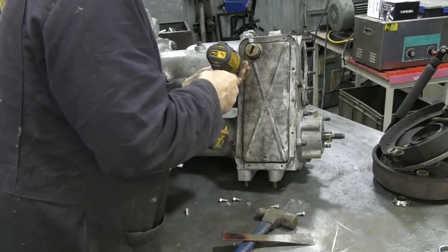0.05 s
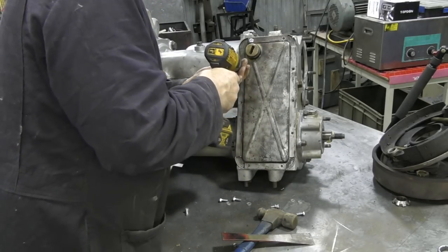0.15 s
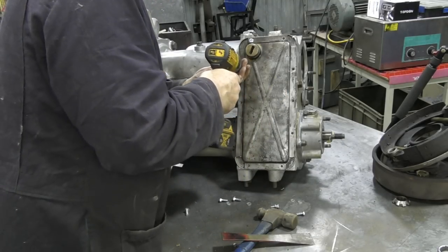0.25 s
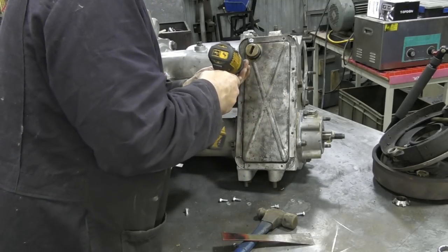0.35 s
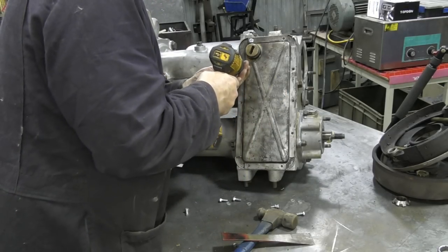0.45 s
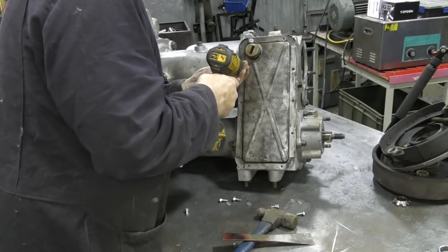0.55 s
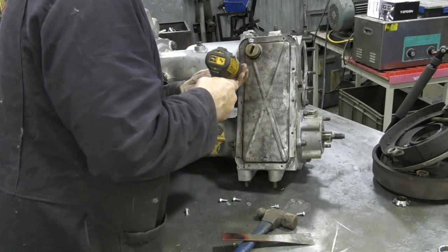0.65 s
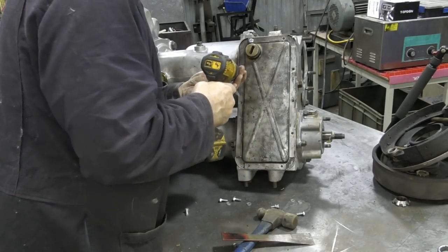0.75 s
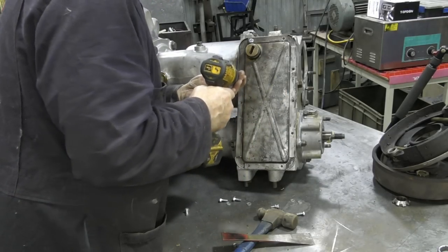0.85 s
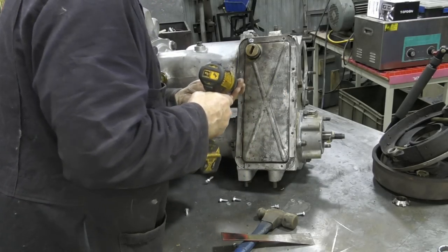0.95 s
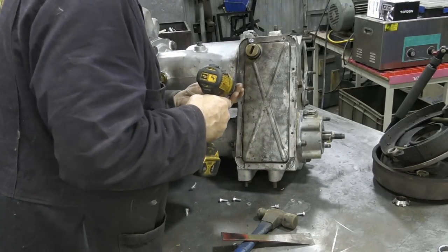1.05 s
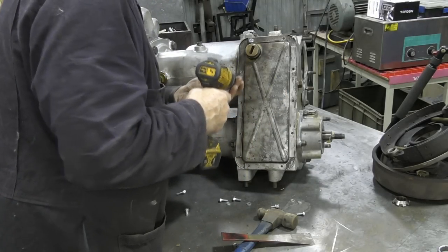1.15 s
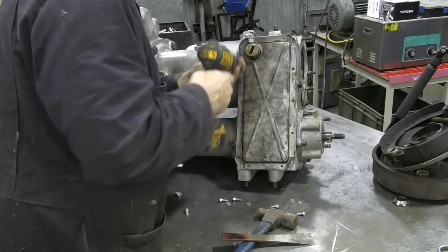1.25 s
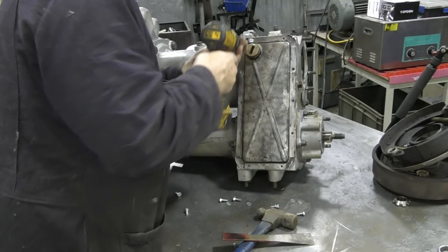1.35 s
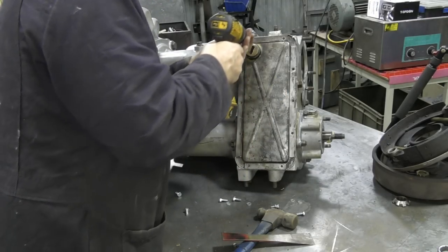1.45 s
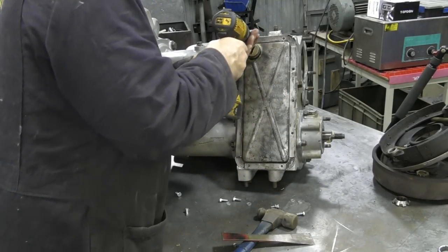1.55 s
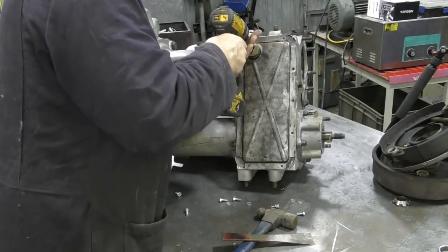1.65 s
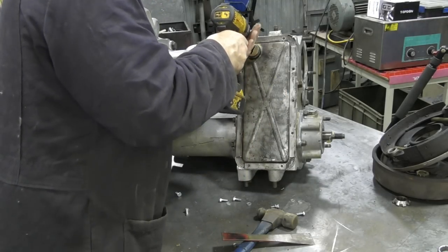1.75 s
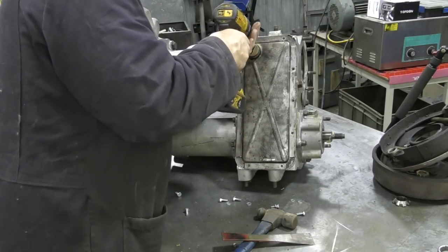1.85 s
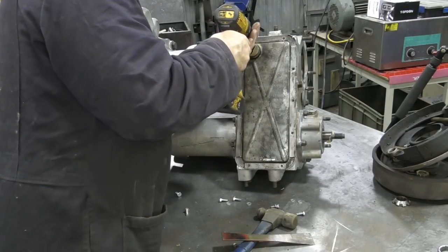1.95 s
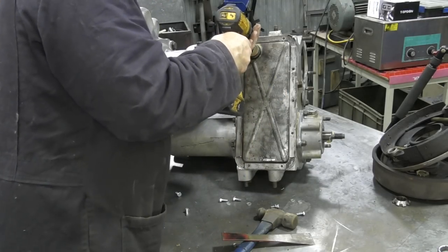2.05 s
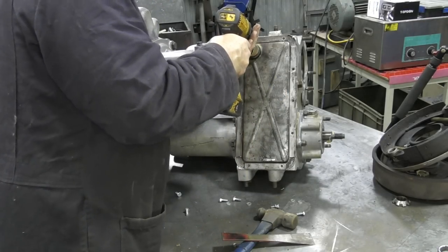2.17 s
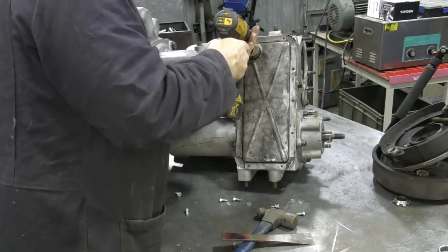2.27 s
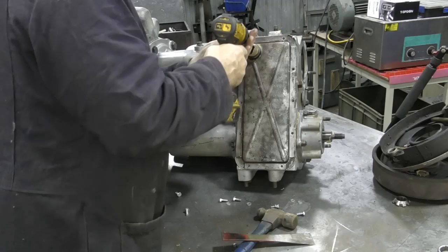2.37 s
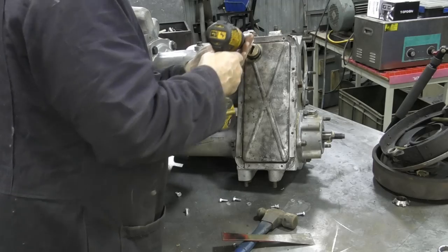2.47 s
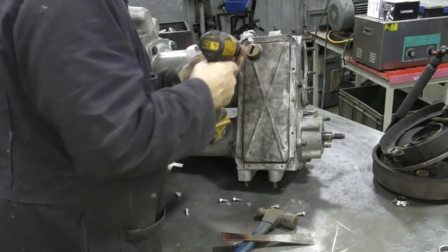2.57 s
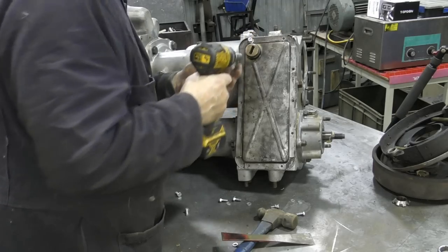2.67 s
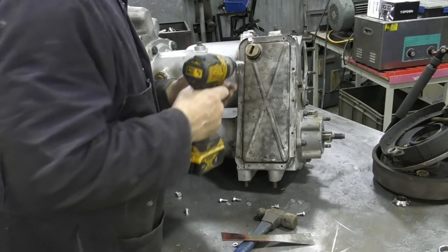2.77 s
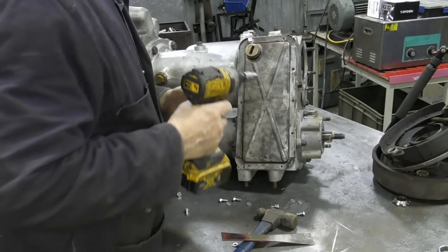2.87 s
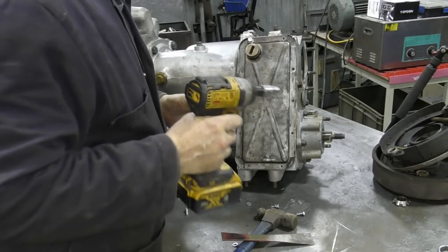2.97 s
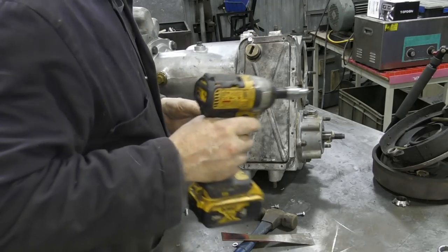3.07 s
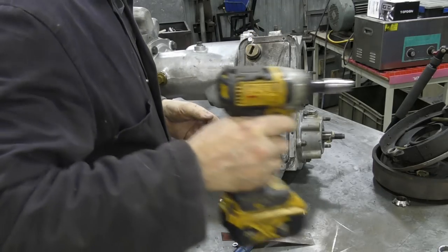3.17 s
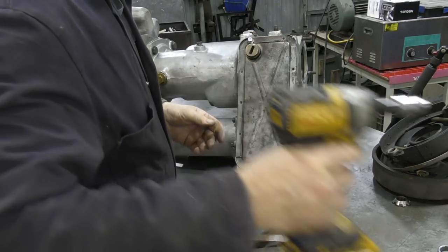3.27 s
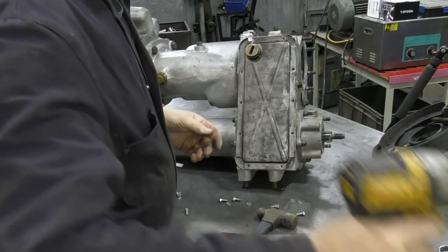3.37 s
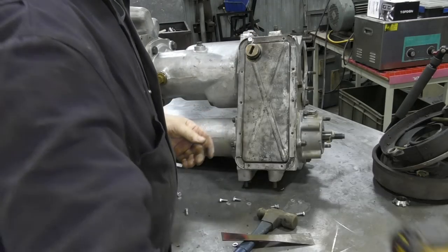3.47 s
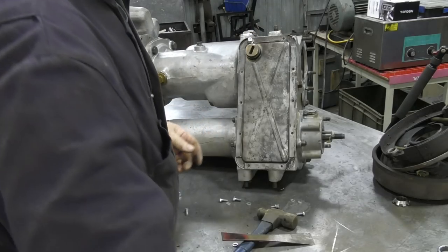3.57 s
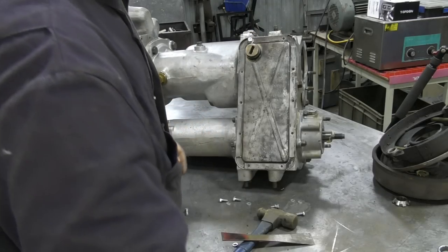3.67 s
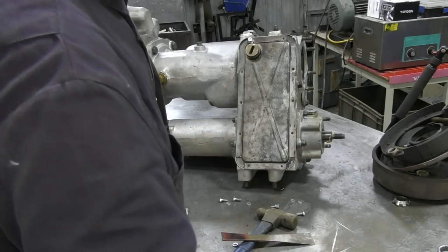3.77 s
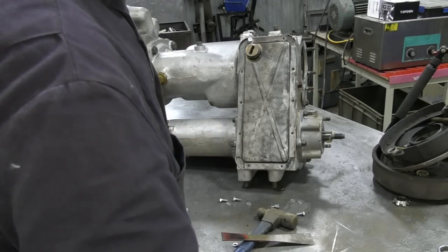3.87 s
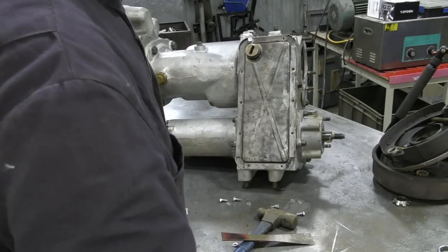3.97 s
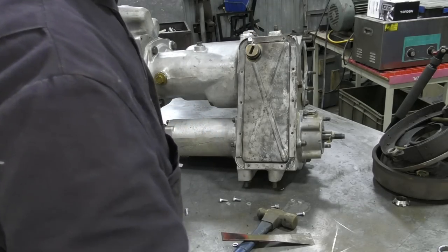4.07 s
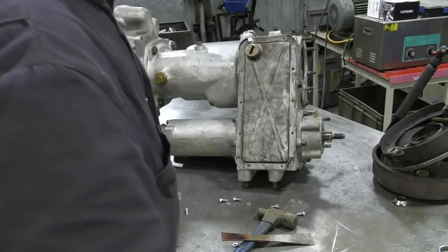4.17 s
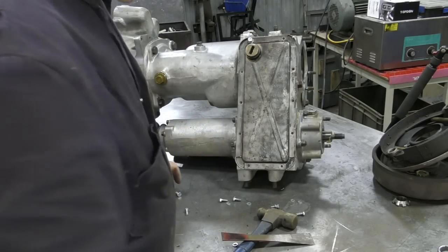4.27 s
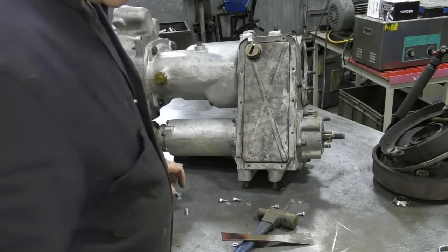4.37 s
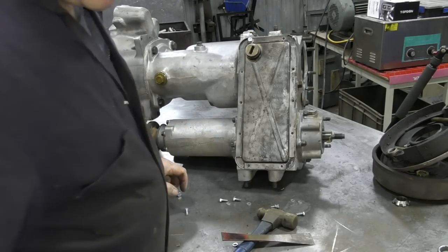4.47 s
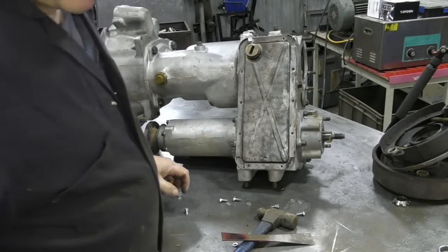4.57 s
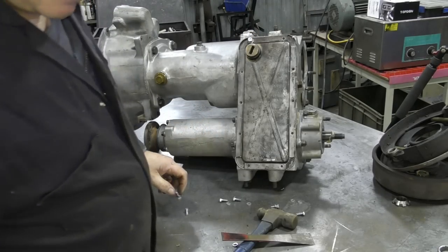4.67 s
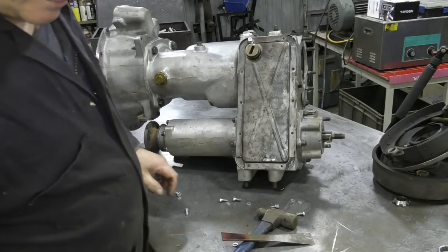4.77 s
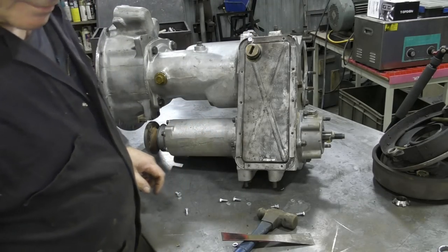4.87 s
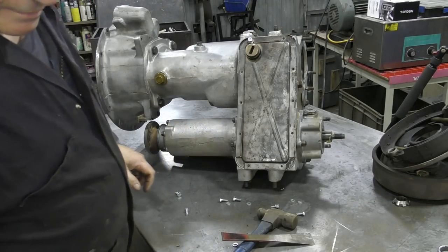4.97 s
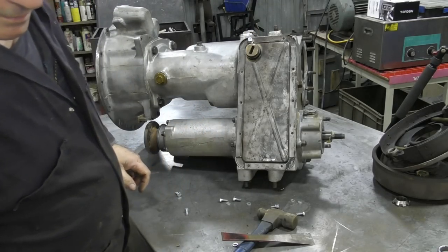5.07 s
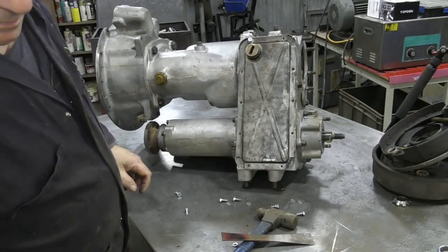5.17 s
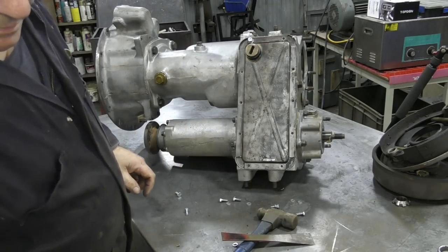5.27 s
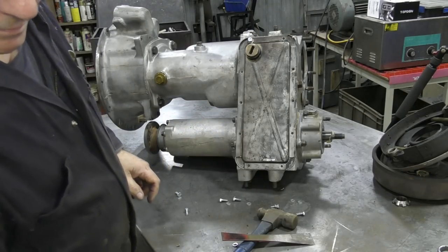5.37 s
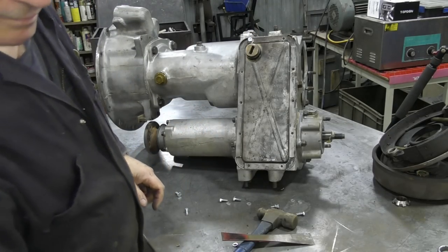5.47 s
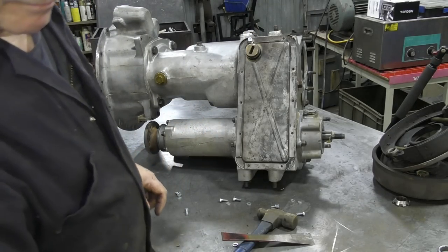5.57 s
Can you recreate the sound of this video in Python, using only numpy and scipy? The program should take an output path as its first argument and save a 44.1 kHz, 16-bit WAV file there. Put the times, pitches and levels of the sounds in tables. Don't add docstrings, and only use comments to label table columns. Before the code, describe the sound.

A close, almost mono workshop scene with a short hard-walled reverberation and a quiet bed of ventilation air and unsteady lamp hum. It opens mid-action: a cordless impact driver strains and hammers roughly, then speeds up in a higher gear whine as the bolt frees, cutting off around 0.36 s with a brief fan rundown. The bolt leaves the socket at 0.4 s, taps lightly, then bounces brightly from 0.63 to 0.9 s, rattling and ticking until about 1.2 s. The socket clicks and clinks onto the next head from 1.25 to 1.65 s amid cloth rustle. A second, shorter driver burst runs 1.66-1.93 s with sharp steel snaps and a small metallic ring. Soft overalls and shuffling feet follow. At 3.38 s the tool lands with a woody-plastic, hollow bench knock, rocking again at 3.5 s. Faint creasing cloth continues until a gritty steel scrape with small clanks at 5.3-5.6 s.

```python
import sys
import numpy as np
from scipy import signal
from scipy.fft import rfft, irfft, next_fast_len
from scipy.io import wavfile
from scipy.ndimage import uniform_filter1d, map_coordinates

SR = 44100
rng = np.random.default_rng(int(sys.argv[2]) if len(sys.argv) > 2 else 0)


def volts(x):
    e = np.asarray(x, float) / 20
    return 10 ** e


def digitize_waveform(pressure):
    field = np.atleast_2d(pressure).T
    bounded = np.clip(field, -1, 1)
    quanta = np.round(bounded * 32767).astype(np.int16)
    wavfile.write(sys.argv[1], SR, quanta)


N = 248018
T = np.arange(N) / SR

# time in seconds, commutation in Hz, shaking in dB, coil current in dB.
PULL_1 = [(0, 1600, -14, -23.5), (.055, 1671, -12.5, -23), (.07, 1618, -17, -21),
          (.115, 1623, -15.5, -22.5), (.15, 1828, -12, -20), (.295, 2247, -11, -25),
          (.315, 2192, -12, -21.5), (.339, 1277, -9.5, -27), (.358, 900.6, -15.5, -45.5)]
PULL_2 = [(1.655, 1206, -25, -41.5), (1.673, 1332, -22, -31), (1.68, 1363, -6.5, -22.5),
          (1.697, 1694, -8, -27), (1.708, 1400, -14.5, -37.5), (1.742, 1767, -12.5, -22),
          (1.8, 1919, -12.5, -22), (1.878, 2023, -11, -23), (1.925, 1974, -13.5, -50)]
# multiple of commutation, level over the current in dB, extra under load in dB.
LOW_ORDERS = [(1, -2.5, -0.5), (2, 0, 4.5), (3, 1.5, 1)]
# multiple of commutation, level in dB.
UPPER_ORDERS = [(4, 4.5), (5, -6), (6, -3), (7, -9)]
# frequency in Hz, density in dB per Hz.
WHIRR = [(35, -77.5), (60, -44), (882, -16.5), (1310, -8.5), (1620, -12), (1950, -10), (2250, -13),
         (2470, -5.5), (2970, -7), (3940, -10.5), (10800, -13.5), (13300, -24), (16000, -38.5)]
# frequency in Hz, width in Hz, level in dB.
COVER = [(750, 22, -5.5), (1350, 440, -13), (2520, 15, 1), (2760, 310, -5.5)]
# time in seconds, level in dB.
HUM = [(0, -19), (.04, -37.5), (.13, -45), (.17, -27.5), (.21, -36.5), (.24, -44.5)]
# start in seconds, level in dB, rise in seconds, fall in seconds.
RUNDOWN = [
    (.36, -38.5, .005, 0.073),
    (1.93, -33, .005, 0.093),
]
# frequency in Hz, density in dB per Hz.
FAN = [(60, -30), (150, -3.5), (1000, -1.5), (4000, -3.5), (10000, -4.5), (13000, -14.5), (16000, -32)]
# time in seconds, level in dB, weight on socket and plate in dB.
JOLTS = [(0.0304, -1, -6), (0.0584, -1.5, -5), (0.1134, -4, -9.5), (0.2464, -6.5, -1), (0.2932, -1, -4),
         (0.3204, -4.5, -3), (0.3441, -4, -5.5), (0.6894, 1, -14), (0.8394, -11.5, -10.5), (1.6835, -5, -1),
         (1.699, -7.5, -2), (1.7534, -3, -5), (1.8914, -3, -1), (1.9164, -8.5, -0.5), (5.3298, -15, -6)]

# frequency in Hz, width in Hz, level in dB.
BOLT = [(4848, 580, -17.5), (5620, 1000, -8), (6520, 660, 2), (7280, 1100, 0.5), (8200, 740, -0.5),
        (9840, 1600, -4), (13000, 5600, -14)]
SOCKET = [(1400, 700, -5), (2140, 600, -2.5), (3140, 1200, -3), (4800, 3900, -9)]
PLATE = [(136, 34, -8), (254, 92, -5), (520, 180, -1.5), (746, 53, 4.5), (985, 130, -2)]
# time in seconds, bright peak in dB, weight on socket and plate in dB.
FREED = [
    (0.4091, -8, -1),
    (0.3924, -24, 14),
]
LOOSE = [
    (0.4843, -23.5, 5.5),
    (0.5604, -19, 12.5),
]
BOUNCES = [(0.63, 6.5, 3), (0.7555, -4, 4), (0.7755, 4.5, 0), (0.9048, -3.5, 2), (5.3592, -17.5, 12.5),
           (5.3926, -15.5, 18)]
# time in
# seconds, peak in dB, weight on socket and plate in dB.
SEATING = [(1.2514, -23, 4), (1.2794, -38.5, -2), (1.4039, -32.5, -16), (1.4198, -45.5, 5),
           (1.4314, -44, 0.5), (1.4563, -40, -0.5), (1.4803, -32, 7.5), (1.4856, -31.5, 8.5),
           (1.6064, -39, -8), (1.6141, -26.5, -5.5), (1.6357, -30, -0.5), (1.6746, -6, -3.5),
           (1.7045, -7, -2.5), (3.5061, -24.5, -1.5)]
# time in seconds, level in dB.
FAINT = [(2.5904, -54), (2.7447, -53.5), (2.8124, -58.5), (3.314, -56.5), (3.7418, -57), (3.7964, -56.5),
         (3.8494, -68), (3.9814, -61), (4.3176, -55.5)]
TICKS = [(1.0889, -29), (1.1024, -32.5), (1.1144, -26.5), (1.1518, -29), (1.163, -32), (1.1757, -26),
         (1.19, -33), (1.2276, -27), (1.5708, -40), (3.4974, -29.5)]
# start in seconds, level in dB, hold in seconds, bench in dB.
ROLL = [(0.638, -13, 0.092, -8), (0.702, -19, 0.0033, -3.5), (0.767, -22.5, 0.031, -7),
        (0.783, -18, 0.012, -8), (0.908, -28, 0.0069, -11.5), (1.068, -48.5, 0.086, -1.5),
        (1.147, -41.5, 0.01, -5.5)]

SNAP_S = [.321, .345, .484, .5605, .698, .738, .776, 1.2514, 1.278, 1.4015, 1.616, 1.636, 1.657, 1.6748,
          1.699, 1.7045, 1.7105, 1.7355, 2.011, 3.503, 3.981, 4.03, 4.885, 5.332, 5.359, 5.36, 5.393, 5.499]
# level in dB, ring in Hz, width in Hz, decay t60 in seconds.
SNAPS = [(-10.5, 6000, 900, 0.044), (-12.5, 6000, 5600, .04), (-25, 9500, 7000, .05),
         (-20.5, 6800, 8000, 0.058), (-11, 8000, 5000, .03), (-17, 7500, 4000, .03),
         (-7.5, 12000, 5000, 0.065), (-22, 3000, 4500, .03), (-43.5, 13000, 5000, .03),
         (-36, 11000, 9000, .06), (-30.5, 8000, 9000, .03), (-33, 8500, 7000, .04), (-28, 9500, 3500, .12),
         (-6, 6800, 9000, .02), (-6.5, 9500, 9000, .02), (-4, 9500, 2300, 0.023), (-14, 8700, 1500, .02),
         (-12, 9000, 6000, .03), (-46, 11000, 8000, .02), (-41, 7300, 3000, .2), (-51, 2000, 1100, .05),
         (-58, 10500, 2500, 0.398), (-57, 9800, 2500, .4), (-17.5, 9000, 6000, .05), (-14, 9100, 6000, .04),
         (-15, 2700, 3100, 0.067), (-13.5, 8300, 1400, 0.041), (-31, 11500, 1500, .03)]
CHIME_S = [1.89, 1.9, 1.885, 1.888, .345, 5.393, .36, 1.698, 1.9, 1.9, 1.252]
PING_S = [.4845, .4845, .561, .561, .561, .631, .69, .691, .905, 1.885, 1.885, 1.885, 1.93, .32, .324, .333,
          .333, 1.679, 1.679, 1.69, 1.752, 5.328, 5.336, 5.33, 5.394, 5.408, 5.588, 5.585]
# frequency in Hz, level in dB, decay t60 in seconds.
CHIMES = [(2580, -22.5, 0.28), (2530, -28.5, .3), (2820, -12, .12), (2405, -12.5, 0.17), (3200, -30, .13),
          (8250, -22, .11), (766, -39, .17), (170, -23.5, .08), (2800, -30, .2), (1700, -29.5, .19),
          (220, -42, .09)]
# frequency in Hz, level in dB, decay t60 in seconds.
PINGS = [(3500, -36, 0.11), (7150, -29.5, .03), (760, -35.5, .18), (4290, -29.5, 0.044),
         (6100, -26, 0.0299), (748.2, -21.5, 0.122), (6500, -15.5, .03), (7400, -14.5, .03),
         (6720, -21.5, 0.033), (3962, -33, .36), (2040, -36.5, .33), (5879, -37, .28), (2600, -29, .45),
         (5850, -16, .05), (3700, -15.5, .04), (2500, -14, .05), (1320, -12, 0.065), (2750, -13, .06),
         (4030, -14.5, .06), (3300, -14.5, .04), (3600, -15, .05), (926, -25.5, .14), (2000, -24, 0.054),
         (520, -29, 0.13), (900, -24.5, .1), (520, -24.5, 0.11), (600, -26, 0.13), (950, -28, .12)]
# time in seconds, frequency in Hz, level in dB, decay t60 in seconds.
CLINKS = [(0.484, 3900, -23.5, .03), (.485, 5020, -25.5, .04), (1.253, 1350, -27.5, .04),
          (1.249, 3400, -27.5, .05), (1.395, 706, -40, .06), (1.42, 1433, -28.5, 0.078),
          (1.422, 520, -31, .09), (1.422, 2300, -37, .04), (1.456, 3413, -37.5, .04),
          (1.457, 1480, -37.5, .1), (1.484, 5500, -30, .05), (1.483, 2420, -31, .05),
          (1.488, 1400, -30, .06), (1.61, 1290, -32.5, 0.087), (1.637, 2840, -31, .05),
          (1.642, 1280, -35, .1)]
THUD_S = (3.377, 3.5)
# frequency in Hz, level in dB, decay t60 in seconds.
LANDING = [(175.6, -29, 0.39), (263, -21, 0.34), (330, -17.5, 0.28), (482, -16.5, 0.2), (531, -26, 0.22),
           (620, -27.5, 0.21), (737, -20.5, 0.12)]
ROCKING = [(150.4, -28, 0.55), (263, -24, 0.32), (395, -31, 0.23), (520, -26, 0.15), (730, -29, 0.2)]

# time in seconds, peak in dB, plastic crack in dB.
KNOCKS = [(3.3763, -19.5, -28), (3.379, -8.5, -6), (3.383, -10.5, -26.5), (3.499, -25, -0.5),
          (3.506, -17, -4), (3.519, -13.5, -17.5)]
# frequency in Hz, width in Hz, level in dB.
BENCH = [(144, 68, -15.5), (270.2, 46, 0.5), (349, 65, -1.5), (480, 52, -2), (540, 62, -4.5),
         (720, 83, -4.5), (1052, 336, -23)]
# frequency in Hz, density in dB per Hz.
CASE = [(50, -71), (140, -17), (500, -12.5), (900, -2.5), (1500, -6), (2200, -7.5), (3500, -17.5),
        (7000, -22.5), (11000, -36), (15000, -66.5)]

# time in seconds, push in dB, weight on the bench in dB.
DRAG = [(5.29, -42, -4.5), (5.297, -30, 1.5), (5.338, -21, 2), (5.395, -30.5, 5.5), (5.42, -33.5, 11),
        (5.45, -39, 4), (5.52, -34, 4.5), (5.6, -34, 10.5), (5.624, -33, 8.5)]
# frequency in Hz, width in Hz, level in dB.
PART = [(5660, 1900, -0.5), (8250, 2000, 2), (11400, 4500, -6.5)]
SLAB = [(500, 100, -0.5), (620, 150, -0.5), (875, 180, 0), (1650, 400, -5.5), (2300, 840, -5),
        (3400, 1500, -9.5), (4500, 960, -13)]

# peak in seconds, level in dB, rise in seconds, fall in seconds, hiss in dB.
RUSTLE = [(1.404, -55, 0.0035, 0.043, 8.5), (1.575, -63.5, 0.0058, .12, 10), (1.42, -42, 0.041, .055, -10),
          (1.475, -44, 0.036, .03, -7), (1.63, -46, 0.06, .05, -9), (1.664, -30, 0.018, .02, -6.5),
          (2.2, -59, 0.16, 0.35, -9), (2.499, -55, 0.31, 0.182, -9.5), (2.6, -59.5, .2, 0.65, -10.5),
          (2.9, -64.5, 0.14, 0.51, -4), (3.62, -57.5, 0.097, .15, -9), (4.035, -50, .03, 0.12, -11),
          (4.325, -63.5, .02, 0.13, -6.5), (4.488, -61, 0.047, .2, -15), (4.75, -54, .05, 0.124, -11),
          (4.89, -53, 0.014, 0.1504, -6), (5.17, -59, 0.06, .45, 2.5)]
# peak in seconds, level in dB, rise in seconds, fall in seconds.
STEPS = [(1.42, -40, .1, 0.19), (2.05, -49.5, .1, 0.19), (2.5, -56, 0.31, .1), (2.6, -60, 0.096, 0.45),
         (3.62, -50, 0.086, 0.084), (3.75, -54.5, 0.35, 1.56), (4.49, -82, .1, 0.28),
         (4.799, -73, .1, 0.078), (4.9, -70.5, 0.087, 0.17), (5.27, -67.5, .4, 0.12)]
CREASES = [(4.055, -54, .06, .13), (4.19, -61, .05, .06), (4.33, -62, .02, .07), (4.77, -58, .07, .1),
           (4.92, -54, .06, .1), (4.5, -62, .04, .07), (2.48, -63, .1, .14)]
# frequency in Hz, density in dB per Hz.
CLOTH = [(240, -37), (400, -5), (581, 2.5), (904, -4), (1540, -2), (2040, -12), (2590, -6), (6000, -20.5),
         (7800, -49.5), (13200, -120)]
HISS = [(2350, -34.5), (4000, -7), (6940, -0.5), (7530, -3.5), (8160, -5), (9170, 0.5), (16000, -23.5)]
SHUFFLE = [(29, -51.5), (50, -18), (167, -6), (367, -7.5), (408, -16.5), (500, -6), (650, -39.5),
           (1100, -120)]
# frequency in Hz, width in Hz, level in dB.
SEAM = [(1600, 290, 3), (2300, 500, -0.5), (3200, 700, -2), (6200, 1200, -9.5)]

# frequency in Hz, decay t60 in seconds.
SHOP = [(200, 0.63), (1000, 0.35), (3000, 0.39), (8000, 0.3), (14000, 0.025)]
# frequency in Hz, level in dB.
SPREAD = [(30, -16.5), (150, -28.5), (700, -33.5), (1200, -40), (2200, -20.5), (3200, -17.5), (5200, -21),
          (8000, -18.5), (14000, -14.5)]
# frequency in Hz, density in dB per Hz.
AIR = [(12, -58.5), (30, -30), (210, -13.5), (234, -5.5), (270, -10), (367, -9), (446, -11.5), (642, -15),
       (949, -16.5), (1030, -16.5), (2260, -21), (4810, -25.5), (10500, -33), (16000, -44.5)]
AIR_SIDE = [(12, -46.5), (30, -23), (270, -3), (468, -6.5), (522, -12.5), (632, -8), (12500, -34.5),
            (14000, -51.5)]
AIR_DB = -59
# frequency in Hz, level in dB.
LAMPS = [(242.2, -73), (360.7, -67), (479.1, -69), (721.4, -66.5)]


def driver(pull, free_s, blow_s, upper_load_db, third_free_db, third_load_db, blur_free):
    ease_s, slots, blur_loaded = 0.0058, 12, .95
    gate, hz, whirr_db, current_db = curves([pull], edge_s=0.005)
    load = .5 - .5 * np.tanh((T - free_s) / ease_s)
    phase = 2 * np.pi * np.cumsum(hz * (1 + .003 * wobble(150))) / SR
    turn = np.cos(phase / slots)
    blur = blur_free + load * (blur_loaded - blur_free)

    def order(k, db):
        level = volts(db + 3.0 + 2.5 * wobble(190))
        scatter = blur * (0.44 + 0.38 * k) * wobble(250)
        return level * np.sin(k * phase + scatter)

    coil = np.zeros(N)
    for k, db, more_db in LOW_ORDERS:
        order_db = current_db + db + load * more_db
        if k == 3:
            order_db = order_db + (1 - load) * third_free_db + load * third_load_db
        coil += order(k, order_db)
    for k, db in UPPER_ORDERS:
        coil += order(k, current_db - 14.5 + load * upper_load_db + db)

    mesh_hz, mesh_load_db, mesh_db_per_octave = 1840, -12, 25.5
    slow_db = mesh_db_per_octave * np.minimum(np.log2(hz / mesh_hz), 0)
    gear_db = whirr_db - 2.0 + load * mesh_load_db + slow_db
    gear_level = volts(gear_db + 1.9 * wobble(90)) * (1 + 0.15 * turn)
    gear = gear_level * np.sin(1.295 * phase + .13 * wobble(200))

    whirr = noise(WHIRR) * volts(2.0 * wobble(70) + 1.3 * wobble(400) + 1.7 * turn)
    whirr = unit(whirr + .6 * rings(whirr, COVER))

    blows_per_s, blow_db = 60.5, 2.5
    hammer = volts(blow_db * load * np.cos(2 * np.pi * blows_per_s * (T - blow_s)))
    return gate * hammer * (coil * (1 + 0.23 * turn) + gear + volts(whirr_db - 5.0) * whirr)


def housing():
    gate, db = curves([HUM])
    resonance = [(753, 35, 0)]  # Hz, width Hz, dB
    return gate * volts(db) * unit(rings(rng.standard_normal(N), resonance))


def rundown():
    return sum(swell(*row, linger=0.81) for row in RUNDOWN) * noise(FAN)


def motor():
    first = driver(PULL_1, free_s=.121, blow_s=0.012, upper_load_db=13.5,
                   third_free_db=-6, third_load_db=-4.5, blur_free=.75)
    hum = housing()
    second = driver(PULL_2, free_s=1.755, blow_s=2, upper_load_db=4.5,
                    third_free_db=-3, third_load_db=-7, blur_free=1.25)
    return first + hum + second + rundown() + taps((JOLTS, (-5.5, -1.5, -22.5)))


def taps(*kinds):
    cracks, t = np.zeros((3, N + SR)), np.arange(SR // 20) / SR
    t60_s = np.array([[.022], [.028], [.035]])
    for events, (bolt_db, socket_db, plate_db) in kinds:
        for s, db, *weight_db in events:
            burst = rng.standard_normal((3, len(t))) * volts(-60 * t / t60_s)
            heavy_db = sum(weight_db)
            share_db = np.array([[bolt_db], [socket_db + heavy_db], [plate_db + heavy_db]])
            cracks[:, round(s * SR):][:, :len(t)] += volts(db + share_db) * burst
    bolt = rings(cracks[0, :N], BOLT)
    socket = filtered(rings(cracks[1, :N], SOCKET), lambda hz: 1 / (1 + 1j * hz / 7000) ** 2)
    plate = above(rings(cracks[2, :N], PLATE), edge_hz=68)
    return volts(1.0) * bolt + volts(12) * socket + volts(14.5) * plate


def contacts():
    return taps((FREED + LOOSE + BOUNCES, (0.5, -19, -27.5)), (SEATING, (-2, 1.05, -6.5)),
                (FAINT, (-5, 6.5, 0.5)), (TICKS, (-3, -19, -30)))


def roll():
    fade_db_per_s, bench_lag_db_per_s = 166, 70
    bounces = np.transpose(ROLL)
    latest = np.maximum(np.searchsorted(bounces[0], T) - 1, 0)
    s, db, hold_s, bench_db = bounces[:, latest]
    fading_s = np.maximum(T - s - hold_s, 0)
    bolt_db = db - fade_db_per_s * fading_s
    bench_db = bench_db + bench_lag_db_per_s * fading_s
    return (T > s) * scrape(bolt_db, bench_db, BOLT, PLATE + SOCKET, rate=13000, spiky_db=2.5)


def snaps():
    out, t = np.zeros(N + SR), np.arange(SR // 8) / SR
    f = np.fft.rfftfreq(len(t), 1 / SR)
    for s, (db, hz, width_hz, t60_s) in zip(SNAP_S, SNAPS):
        response = f * width_hz / np.abs(hz * hz - f * f + 1j * f * width_hz)
        steel = irfft(rfft(rng.standard_normal(len(t))) * response, len(t))
        out[round(s * SR):][:len(t)] += volts(db - 3.5 - 60 * t / t60_s) * unit(steel)
    return out[:N]


def chimes():
    chimed = [(s, *mode) for s, mode in zip(CHIME_S, CHIMES)]
    pinged = [(s, *mode) for s, mode in zip(PING_S, PINGS)]
    thuds = [(s, *mode) for s, modes in zip(THUD_S, (LANDING, ROCKING)) for mode in modes]
    struck = [(chimed, .7, 70), (CLINKS, 1.4, 300), (pinged, 1.0, 160), (thuds, 1.1, 70)]
    out = np.zeros(N)
    for modes, blur_rad, changes_per_s in struck:
        for s, hz, db, t60_s in modes:
            since_s = np.maximum(T - s, 0)
            level = volts(db - 60 * since_s / t60_s + 1.8 * wobble(50))
            tone = np.sin(2 * np.pi * hz * since_s + blur_rad * wobble(changes_per_s))
            out += level * tone * (T > s)
    return out


def knocks():
    blows, t = np.zeros((2, N + SR)), np.arange(SR // 4) / SR
    t60_s = np.array([[.045], [.11]])
    for s, db, crack_db in KNOCKS:
        burst = rng.standard_normal((2, len(t))) * volts(-60 * t / t60_s)
        burst[0] += 1.74 * np.exp(-t / 0.00019)
        blows[:, round(s * SR):][:, :len(t)] += volts(db + np.array([[0], [crack_db]])) * burst
    crack = filtered(blows[1, :N], lambda hz: volts(along(CASE, hz)))
    thud = above(rings(blows[0, :N], BENCH), edge_hz=170)
    thud = filtered(thud, lambda hz: 1 / (1 + 1j * hz / 1500) / (1 + 1j * hz / 6000))
    return volts(10.5) * thud + volts(8.0) * crack


def scrape(db, bench_db, steel, base, rate, spiky_db):
    part = unit(rings(grit(rate, spiky_db), steel))
    bench = unit(above(rings(grit(rate, spiky_db), base), edge_hz=160))
    return volts(db - 3.5 + 1.8 * wobble(60)) * (part + volts(bench_db + 2.2 * wobble(28)) * bench)


def drag():
    gate, db, weight_db = curves([DRAG])
    rumble_db = db - 5 + 57.0 * (T - DRAG[-1][0])
    rumble = volts(rumble_db) * unit(rings(rng.standard_normal(N), BENCH))
    return gate * (scrape(db, weight_db, PART, SLAB, rate=9800, spiky_db=2.5) + rumble)


def rustle():
    body = sum(swell(*row[:4]) for row in RUSTLE)
    hiss = sum(swell(*row[:4]) * volts(row[4]) for row in RUSTLE)
    feet = sum(swell(*row) for row in STEPS)
    flutter = volts(2.2 * wobble(44) + 1.5 * wobble(300))
    cloth = volts(-1.0) * body * noise(CLOTH) + volts(-2.5) * hiss * noise(HISS)
    shoes = volts(-6.5) * feet * noise(SHUFFLE)
    return flutter * (cloth + shoes)


def creases():
    folding = sum(swell(*row) for row in CREASES) * volts(1.6 * wobble(35))
    return folding * unit(rings(grit(7000, spiky_db=2.0), SEAM))


def shop(x):
    hz, t, z = signal.stft(rng.standard_normal(SR * 2 // 3), SR, nperseg=256)
    decay = volts(-60 * t / along(SHOP, hz)[:, None])
    tail = signal.istft(z * decay, SR, nperseg=256)[1]
    return signal.fftconvolve(np.pad(x, (260, 0)), tail / np.linalg.norm(tail))[:N]


def shifting(x, count=3):
    slot = (T // .043).astype(int) % count
    return sum(shop(x * uniform_filter1d(1. * (slot == k), size=90)) for k in range(count))


def floor():
    hum = sum(volts(db + 2.5 * wobble(12.0)) * np.sin(2 * np.pi * hz * T + 1.7 * wobble(7.5))
              for hz, db in LAMPS)
    return volts(AIR_DB + 0.49 * wobble(8.8)) * noise(AIR) + hum


def unit(x):
    return x / np.sqrt(np.mean(x ** 2) + 1e-20)


def along(points, hz):
    f, v = np.transpose(points)
    return np.interp(np.log(hz + 1), np.log(f + 1), v)


def curves(parts, edge_s=0.0022):
    s, *cols = np.transpose(np.vstack(parts))
    gate = np.clip(np.minimum(T - s[0] + edge_s, s[-1] + edge_s - T) / edge_s, 0, 1)
    return [gate] + [np.interp(T, s, c) for c in cols]


def wobble(rate):
    return map_coordinates(rng.standard_normal(int(N * rate / SR) + 4), [T * rate])


def swell(s, db, rise_s, fall_s, linger=1.2):
    before = (s - T) / rise_s
    after = (np.maximum(T - s, 0) / fall_s) ** linger
    return volts(db - 20 * np.maximum(before, after))


def filtered(x, response):
    m = next_fast_len(N + SR // 2)
    return irfft(rfft(x, m) * response(np.fft.rfftfreq(m, 1 / SR)), m)[..., :N]


def above(x, edge_hz):
    return filtered(x, lambda hz: (1j * hz / (edge_hz + 1j * hz)) ** 2)


def rings(x, peaks):
    def response(f):
        return sum((-1) ** k * volts(db) * 1j * f * width / (hz * hz - f * f + 1j * f * width)
                   for k, (hz, width, db) in enumerate(peaks))
    return filtered(x, response)


def noise(spectrum):
    return unit(filtered(rng.standard_normal(N), lambda hz: volts(along(spectrum, hz))))


def grit(rate, spiky_db):
    hits = rng.random(N) < rate / SR
    size = volts(spiky_db * np.minimum(rng.exponential(size=N), 4.5))
    return hits * size * rng.standard_normal(N)


def scene():
    steel = contacts()
    tool = motor()
    # sound, room answer, room dB, off-centre dB
    sources = [(tool, shop, -10, -16),
               (steel, shifting, -5, 3),
               (knocks(), shifting, -7, 4),
               (above(chimes(), edge_hz=150), shifting, -14, -6),
               (roll(), shop, -6, 4),
               (drag(), shop, -6, 5),
               (rustle() + creases(), shop, -12, 3),
               (snaps(), shifting, -8, 0)]
    mid = sum(x + volts(wet_db) * room(x) for x, room, wet_db, _ in sources)
    mid = above(mid, edge_hz=28) + floor()
    off = sum(volts(side_db) * x for x, _, _, side_db in sources)
    scattered = .8 * np.roll(off, 9) + 0.61 * shop(off) + 0.53 * shop(tool)
    side = filtered(scattered, lambda hz: volts(along(SPREAD, hz)))
    side += volts(AIR_DB - 8) * noise(AIR_SIDE)
    return np.array([mid + side, mid - side])


def band_limit(x):
    return signal.sosfilt(signal.butter(12, 15900, fs=SR, output="sos"), x)


def record(dry):
    clipped = dry / (1 + np.abs(dry / .97) ** 6) ** (1 / 6)
    limited = filtered(clipped, lambda hz: 1 / (1 + (hz / 15750) ** 150))
    return band_limit(limited)


dry = scene()
out = record(dry)
digitize_waveform(out)
```